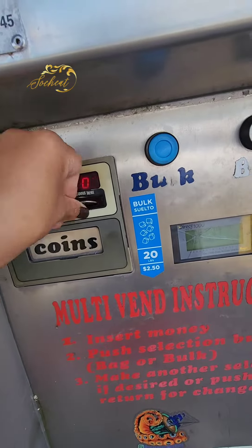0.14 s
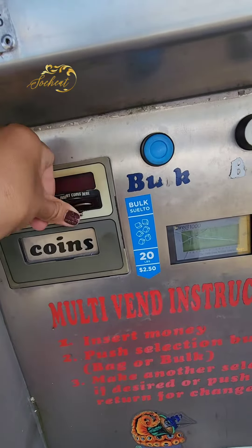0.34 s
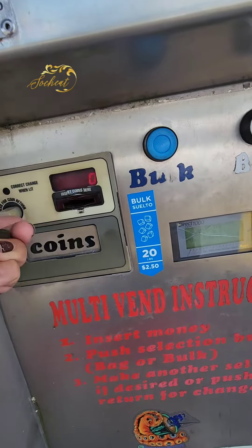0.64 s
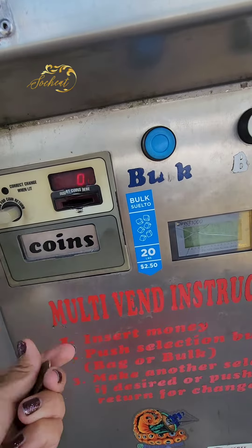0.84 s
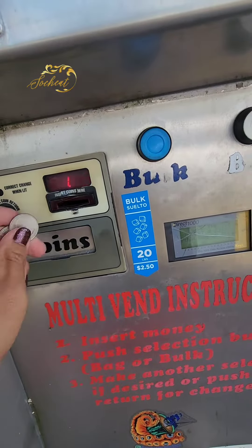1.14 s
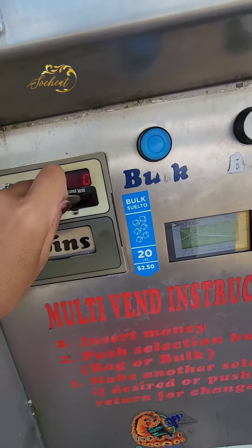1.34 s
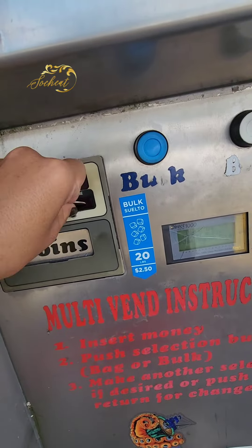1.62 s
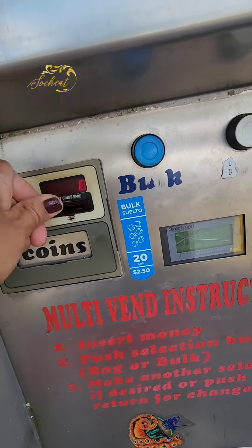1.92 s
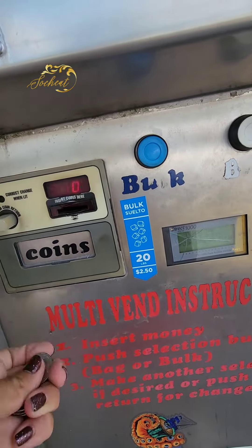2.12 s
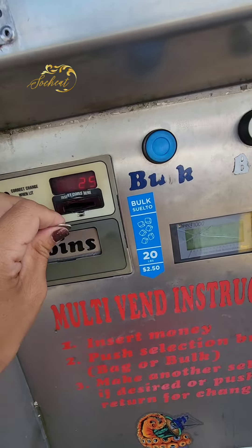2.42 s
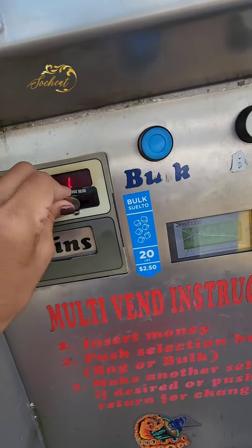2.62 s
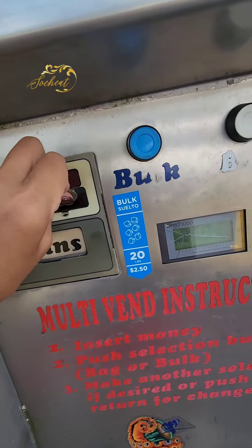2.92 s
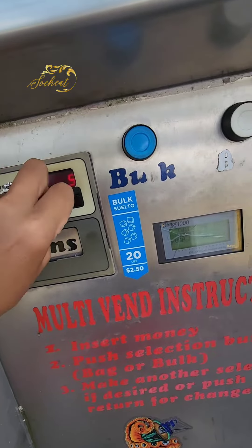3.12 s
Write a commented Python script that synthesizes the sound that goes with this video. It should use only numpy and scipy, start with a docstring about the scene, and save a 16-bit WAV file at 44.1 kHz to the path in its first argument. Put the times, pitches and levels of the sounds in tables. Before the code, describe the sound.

Coins go into a metal vending machine, heard close up outdoors. Light slot taps and bright chinks until 0.55 s, then a cracking, rolling rattle down a hollow chute from 0.6 to 1.0 s. Sparse taps and small chinks follow from 1.1 to 2.0 s, a sharper second drop at 2.1-2.45 s, a hard clack and chink at 2.9 s, then fading taps. Low compressor hum, wavering drone and rumble continue beneath.

```python
"""Outdoors, at a steel vending machine: coins are pushed into its slot, close to a phone.
They tap and scrape at the slot, then crack and roll down a chute in the hollow cabinet: struck modes
under coloured noise bursts. A gate clacks, the panel thuds and loose coins chink in the hand.
The cooling compressor hums in wavering sines, a low drone comes and goes, filtered noise rumbles."""
import sys
import numpy as np
from scipy import signal
from scipy.fft import rfft, irfft
from scipy.io import wavfile
from scipy.ndimage import uniform_filter1d

SR = 44100
rng = np.random.default_rng(int(sys.argv[2]) if len(sys.argv) > 2 else 0)


def wrap_up_sound(samples):
    """Save the sound to the file named by the first command line argument, as 16-bit audio."""
    columns = np.atleast_2d(samples).T
    # keep every value between -1 and 1, then stretch to whole-number steps
    tamed = np.clip(columns, -1, 1)
    steps = np.round(tamed * 32767).astype(np.int16)
    wavfile.write(sys.argv[1], SR, steps)


N = 143766
RING_T = np.arange(SR // 2) / SR  # time axis of every struck sound, half a second long
CRACK_T60_S = 0.043  # dying time of the crack on chute and slot
CHUTE_PAN_DB, SLOT_PAN_DB, COIN_PAN_DB = -1, -0.5, -2  # left minus right


def undb(db):
    """Gain of a level in dB."""
    return 10 ** (np.asarray(db) / 20)


def on_log(points, hz):
    """Read (Hz, value) points on a log-frequency axis."""
    point_hz, value = np.array(points).T
    return np.interp(np.log(np.maximum(hz, 1)), np.log(point_hz), value)


def noise(colour, size, tilt_db=0):
    """Two unrelated noises in one colour, tilted in dB per octave above its first point; joint rms 1."""
    hz = np.maximum(np.fft.rfftfreq(size, 1 / SR), 1)
    octaves = np.log2(np.maximum(hz, colour[0][0]))
    shape = undb(on_log(colour, hz) + tilt_db * octaves)
    x = irfft(rfft(rng.standard_normal((2, size))) * shape, size)
    return x / x.std()


def walk(rate):
    """Slow random wander with a spread near 1: held random steps, smoothed twice."""
    step = int(SR / rate)
    held = np.repeat(rng.standard_normal(N // step + 1), step)
    smooth = uniform_filter1d(uniform_filter1d(held, step), step)
    return smooth[:N] * np.sqrt(2)


def fade(t60):
    """Quick rise and exponential decay."""
    attack_s = 0.00084
    rise = 1 - np.exp(-RING_T / attack_s)
    return rise * np.exp(-np.log(1000) * RING_T / t60)


def burst(colour, t60, tilt_db=0):
    """A crowd of close resonances dying away together, with a new random ripple for each blow."""
    ripple_db, ripple_hz = 3.4, 170  # depth, spacing
    size = len(RING_T)
    knots = np.arange(0, SR / 2, ripple_hz)
    ripple = np.interp(np.fft.rfftfreq(size, 1 / SR), knots, rng.standard_normal(len(knots)))
    x = irfft(rfft(noise(colour, size, tilt_db)) * undb(ripple_db * ripple), size)
    return x / x.std() * fade(t60)


def ring(modes, tilt_db=0, spread=0.0048, favoured_hz=None):
    """Struck modes; each blow weights them anew, most of all near the frequency that its spot favours."""
    favour_db, favour_octaves, scatter_db = 7.5, 0.15, 2
    hz, db, t60 = np.array(modes).T
    if favoured_hz:
        db = db + favour_db * np.exp(-(np.log2(hz / favoured_hz) / favour_octaves) ** 2)
    gains = undb(db + tilt_db * np.log2(hz) + scatter_db * rng.standard_normal(len(hz)))
    gains = gains * np.sqrt(2 / np.sum(gains ** 2))
    hz = hz * (1 + spread * rng.standard_normal(len(hz)))
    out = 0
    for f, gain, decay in zip(hz, gains, t60):
        phase = rng.random((2, 1))  # in turns, unrelated left and right
        out = out + gain * fade(decay) * np.sin(2 * np.pi * (f * RING_T + phase))
    return out


def chatter(bodies, length, rate, scatter_db):
    """Random tiny contacts, shared among several ringing spots; rms 1 over the length."""
    x = 0
    for body in bodies:
        chance, size = rng.random(len(RING_T)), rng.standard_normal(len(RING_T))
        touches = chance < rate / len(bodies) / SR
        contacts = touches * undb(scatter_db * size) * (RING_T < length)
        x = x + signal.fftconvolve(contacts[None], body, axes=1)
    return x * np.sqrt(2 * length * SR / (np.sum(x ** 2) + 1e-12))


def add(out, start, x, pan_db=0):
    """Mix a sound in at its time, leaning left by pan_db."""
    i = int(start * SR)
    out[:, i:i + x.shape[1]] += x[:, :N - i] * undb(np.array([[pan_db], [-pan_db]]) / 2)


# colour of metal edge on metal, in snaps and scrapes [f/Hz, level/dB per Hz]
EDGE_COLOUR = [(400, -2), (2000, 2), (4500, 2.5), (7000, 3), (9500, -6), (13000, -1.5), (16000, -9.5)]


def snap(tilt_db):
    """The first instant of metal touching metal: noise that dies within a few milliseconds."""
    snap_db, snap_s = -2, 0.00086  # level, time constant
    return undb(snap_db) * noise(EDGE_COLOUR, len(RING_T), tilt_db) * np.exp(-RING_T / snap_s)


# coin blows on the chute [t/s, level/dB, brightness/dB per octave, extra cabinet level/dB, favoured f/Hz]
CHUTE_BLOWS = [(0.608, -31.5, -4, -2, 2500), (0.647, -27.5, -4, -3, 2300), (.656, -18.5, 0, -7, 1080),
               (0.6938, -26, -1, 0, 2440), (0.7204, -26.5, -2, -10, 1960), (0.7606, -20, -1.5, -2, 1920),
               (0.796, -35.5, -4, 8, 2400), (0.816, -21.5, -1, -4.5, 2600), (0.8627, -25, -4, -1, 1970),
               (0.8875, -24.5, 0, -6, 4270), (0.906, -33.5, 3, -7, 3240), (0.9742, -32, 0.5, -5, 4270),
               (2.1154, -27.5, -3.5, -13, 2550), (2.1326, -15, 3, -1, 2500), (2.151, -28, -6.5, -12, 2400),
               (2.166, -27.5, -4.5, -7, 1880), (2.2013, -31.5, -3, 0, 4930), (2.2189, -22.5, 1, 1, 1840),
               (2.2335, -30.5, -3.5, 3, 2200), (2.2994, -21.5, -2, -9, 4270), (2.3446, -28, -2.5, -1, 1950),
               (2.409, -36.5, 0, -7, 4270), (2.4195, -32.5, 3, -1, 1950), (2.458, -33.5, 0, -6, 2390)]
# chute modes [f/Hz, relative level/dB, t60/s]
CHUTE_RESONANCES = [(347, -12, 0.12), (862, -9, 0.074), (1085, -4.5, 0.061), (1294, -8.5, 0.04),
                    (1838, 4, 0.062), (1945, 2.5, 0.049), (2215, 0.5, 0.044), (2437, 0.5, 0.065),
                    (2508, -2.5, 0.055), (2750, -1, 0.044), (3260, -3, 0.055), (4275, 4, 0.044),
                    (4880, -2.5, 0.063), (11100, -13, .04)]
# colour of the crack on the chute [f/Hz, level/dB per Hz]
CHUTE_CRACK_COLOUR = [(300, -3), (900, -9.5), (2400, 0), (4800, 2), (7500, -7.5), (11000, -8), (16000, -10)]
# colour of the hollow cabinet [f/Hz, level/dB per Hz]
CABINET_COLOUR = [(300, -17), (900, 1.5), (1500, -3), (2300, 6), (3500, -9), (4700, -10.5), (8000, -12),
                  (16000, -30)]


def chute():
    """A falling coin cracks against the chute, rings it and stirs the cabinet."""
    crack_db, modes_db, cabinet_base_db, cabinet_t60_s = 0.5, -0.5, -6, 0.17
    out = np.zeros((2, N))
    for start, db, tilt, cabinet_db, hz in CHUTE_BLOWS:
        crack = undb(crack_db) * burst(CHUTE_CRACK_COLOUR, CRACK_T60_S, tilt)
        modes = undb(modes_db) * ring(CHUTE_RESONANCES, tilt, favoured_hz=hz)
        cabinet = undb(cabinet_base_db + cabinet_db) * burst(CABINET_COLOUR, cabinet_t60_s)
        add(out, start, undb(db) * (snap(tilt) + crack + modes + cabinet), CHUTE_PAN_DB)
    return out


# coins rolling along the chute [t/s, length/s, level/dB, brightness/dB per octave]
ROLL_RUNS = [(0.564, 0.072, -41, -4.5), (0.667, .19, -42, 1), (.92, 0.088, -43, 2),
             (2.014, 0.09, -41.5, -4), (2.141, 0.15, -42.5, -6)]
# modes of the ramp that the coins roll on [f/Hz, relative level/dB, t60/s]
RAMP_RESONANCES = [(1865, -1.5, .03), (2300, -3, 0.03), (2535, 2, 0.044), (4320, -8, .03)]


def rolls():
    """The rim bumps along the chute and keeps its ramp ringing."""
    bumps_per_s, scatter_db = 480, 2.5
    crack_db, crack_t60_s, ramp_db = 2, 0.023, -1.5
    out = np.zeros((2, N))
    for start, length, db, tilt in ROLL_RUNS:
        spots = [undb(crack_db) * burst(CHUTE_CRACK_COLOUR, crack_t60_s, tilt) for _ in range(2)]
        spots.append(undb(ramp_db) * ring(RAMP_RESONANCES, tilt))
        add(out, start, undb(db) * chatter(spots, length, bumps_per_s, scatter_db), CHUTE_PAN_DB)
    return out


# coin taps on the slot plate [t/s, level/dB, brightness/dB per octave, ring level/dB, favoured f/Hz]
SLOT_TAPS = [(0.0943, -40, -2.5, 0.5, 3120), (0.3405, -29.5, 2, 2.5, 2320), (0.3656, -35, -3, 5, 3150),
             (0.5104, -31, 3.5, -10, 1540), (1.152, -37, 1, 1, 4450), (1.363, -26.5, 0.5, 2.5, 1300),
             (1.3954, -32.5, -5, -2, 2770), (1.4186, -35.5, -0.5, -11, 2780), (1.44, -32.5, 1, -9, 4420),
             (1.5932, -36, -2, -1.5, 2320), (1.8575, -26.5, 2, 3, 3150), (1.995, -30.5, -2, -5, 1540),
             (2.672, -29.5, -3, -12, 3150), (2.8829, -16.5, 2.5, -2.5, 2320), (2.9082, -28, -1, -14, 4420),
             (2.953, -35.5, -2, -1, 4420), (3.0025, -32.5, -4, -0.5, 3150), (3.048, -40.5, -3, 3, 3150),
             (3.139, -29, -2.5, 1.5, 1300)]
# slot plate modes [f/Hz, relative level/dB, t60/s]
SLOT_RESONANCES = [(1289, -9.5, 0.088), (1557, -10.5, 0.078), (2324, -4.5, 0.039), (2850, 0.5, 0.056),
                   (3196, -1, 0.045), (4420, -2, .03), (4880, -9, 0.053), (6140, -12, .04)]
# colour of the crack on the slot and of its plate [f/Hz, level/dB per Hz]
SLOT_COLOUR = [(300, 4), (900, -5), (1500, 3), (3200, -0.5), (6500, -3), (8500, -8.5), (13000, -16.5),
               (16000, -10.5)]


def slot():
    """A held coin taps the slot: a snap and crack, plate modes and a longer noisy plate tail."""
    crack_db, plate_db, plate_t60_s = 2.5, -5.5, 0.15
    out = np.zeros((2, N))
    for start, db, tilt, ring_db, hz in SLOT_TAPS:
        crack = undb(crack_db) * burst(SLOT_COLOUR, CRACK_T60_S, tilt)
        modes = undb(ring_db) * ring(SLOT_RESONANCES, tilt, favoured_hz=hz)
        plate = undb(plate_db) * burst(SLOT_COLOUR, plate_t60_s)
        add(out, start, undb(db) * (snap(tilt) + crack + modes + plate), SLOT_PAN_DB)
    return out


# modes of the gate behind the slot, a coin jammed hard against it [f/Hz, level/dB, t60/s]
GATE_RESONANCES = [(1510, -8, 0.032), (1880, -9, 0.046), (3207, -4.5, 0.076), (3252, -0.5, 0.067),
                   (4970, -17, 0.046), (6450, -4, .035)]


def gate():
    """One hard clack that rings the gate, nearly in step at both ports."""
    start_s, level_db, pan_db = 2.8832, -21.5, 12
    port_phase = np.array([[0], [.15]])  # turns, left and right
    out = np.zeros((2, N))
    clack = 0
    for hz, db, t60 in GATE_RESONANCES:
        turns = hz * RING_T + rng.random() + port_phase
        clack = clack + undb(db) * fade(t60) * np.sin(2 * np.pi * turns)
    add(out, start_s, undb(level_db) * np.sqrt(2) * clack, pan_db)
    return out


# coin edges sliding on metal [t/s, length/s, level/dB, brightness/dB per octave]
SCRAPE_RUNS = [(0.519, 0.045, -35.5, -1.5), (0.7232, 0.027, -28.5, 5.5), (0.897, .02, -42, 0),
               (2.359, .018, -30, -2), (2.863, 0.02, -36.5, -3), (3.136, 0.024, -32, 3.5)]


def scrapes():
    """A sliding rim catches and slips in a dense run of tiny ticks."""
    slips_per_s, scatter_db, slip_t60_s = 700, 3, 0.019
    out = np.zeros((2, N))
    for start, length, db, tilt in SCRAPE_RUNS:
        spots = [burst(EDGE_COLOUR, slip_t60_s, tilt) for _ in range(3)]
        add(out, start, undb(db) * chatter(spots, length, slips_per_s, scatter_db), COIN_PAN_DB)
    return out


# dull knocks on the front panel [t/s, level/dB]
PANEL_KNOCKS = [(0.58, -28.5), (1.1, -27), (2.884, -31), (3.003, -25.5), (3.14, -31.5), (2, -30.5),
                (.657, -37), (2.134, -24), (1.996, -32)]
# front panel modes [f/Hz, relative level/dB, t60/s]
PANEL_RESONANCES = [(317, -14, .06), (562, 0.5, 0.079), (786, -3, 0.052), (897, 2, 0.048)]
# colour of the panel's body [f/Hz, level/dB per Hz]
PANEL_COLOUR = [(120, -9), (300, 0), (450, 1), (570, -3), (850, -7), (1300, -11), (3000, -16), (10000, -50)]


def thumps():
    """Now and then the whole front panel thuds: a few low modes and a short dull burst."""
    body_db, body_t60_s = -2.5, 0.047
    out = np.zeros((2, N))
    for start, db in PANEL_KNOCKS:
        body = undb(body_db) * burst(PANEL_COLOUR, body_t60_s)
        add(out, start, undb(db) * (ring(PANEL_RESONANCES) + body))
    return out


# coins chinking together [t/s, tick level/dB, ring level/dB, ring time factor left by the fingers, pitch ratio]
COIN_CHINKS = [(0.5373, -22.5, -39, .4, 1), (0.556, -21.5, -37, .4, 1), (.781, -30, -48, .1, 1),
               (1.2238, -27.5, -33, 0.52, 1), (1.6469, -28, -26, .8, 1), (1.722, -38, -32, 1.3, 0.99),
               (1.994, -28.5, -34.5, 0.32, 1), (2.597, -50, -27, 0.18, .98), (2.908, -15, -20, 0.19, 0.82),
               (3.14, -35, -32, 1.6, 0.98)]
# modes of a coin at pitch ratio 1 and ring time factor 1 [f/Hz, relative level/dB, t60/s]
COIN_RESONANCES = [(6300, -22, 0.4), (9420, -15, 0.44), (15230, -1.5, 0.23), (15100, -8, 0.1),
                   (15440, -2, 0.2), (15500, 3.5, 0.2)]
# colour of coin striking coin [f/Hz, level/dB per Hz]
TICK_COLOUR = [(500, -18), (2000, -18), (5000, 2), (7000, 2), (9500, -10), (11500, 2), (12900, 2),
               (14000, 3), (16000, -5.5)]
# colour of the many high overtones of a handful of coins [f/Hz, level/dB per Hz]
SHIMMER_COLOUR = [(1000, 1.5), (4000, -5), (6500, -4.5), (9400, -3.5), (11000, -10), (14500, -9),
                  (15300, -4), (16000, -0.5)]


def chinks():
    """Coin meets coin: a bright tick, two slightly unlike rings and a shimmer, damped by the fingers."""
    size_spread, second_coin_db, tick_t60_s = 0.002, -10, 0.03
    shimmer_db, shimmer_t60_s = -3.5, 0.36  # time at ring time factor 1
    out = np.zeros((2, N))
    for start, tick_db, ring_db, free, pitch in COIN_CHINKS:
        modes = [(hz * pitch, db, t60 * free) for hz, db, t60 in COIN_RESONANCES]
        first = ring(modes, spread=size_spread)
        second = undb(second_coin_db) * ring(modes, spread=size_spread)
        shimmer = undb(shimmer_db) * burst(SHIMMER_COLOUR, shimmer_t60_s * free)
        tick = undb(tick_db) * burst(TICK_COLOUR, tick_t60_s)
        add(out, start, tick + undb(ring_db) * (first + second + shimmer), COIN_PAN_DB)
    return out


# left minus right of the sounds that pass through ports() [f/Hz, level/dB]
PORT_BALANCE = [(500, 2), (1100, 4), (2000, 1.5), (4000, -4), (12000, -0.5)]


def ports(x):
    """Part of the sound comes straight, left port first; the middle range leans left, the treble right."""
    direct_share, direct_lag_s = 0.32, 0.0002103  # amplitude share and delay at the right port
    hz = np.fft.rfftfreq(N, 1 / SR)
    left, scattered = rfft(x)
    direct = left * np.exp(-2j * np.pi * hz * direct_lag_s)
    right = direct_share * direct + np.sqrt(1 - direct_share ** 2) * scattered
    lean_db = on_log(PORT_BALANCE, hz)
    return irfft(np.array([left, right]) * undb(np.array([lean_db, -lean_db]) / 2), N)


# compressor lines [f/Hz, level/dB rms before waver and lean, waver share]
HUM_LINES = [(171.8, -28.5, 0.037), (191.3, -40.5, 0.28), (275.5, -50.5, 0.55), (402, -58, 0.57),
             (427.5, -57, 0.54), (513.6, -51, 0.46), (571, -57.5, 0.42), (859, -63, 1)]


def compressor():
    """Wavering motor lines that reach the left port a little sooner and lean left."""
    port_lag_s, drift_hz = 0.00017, 0.599
    t = np.arange(N) / SR + np.array([[port_lag_s], [0]])
    out = 0
    for hz, db, waver in HUM_LINES:
        level = undb(db) * (1 + waver * walk(8.94))
        drift = drift_hz * np.cumsum(walk(4.06)) / SR
        out = out + level * np.sin(2 * np.pi * (hz * t + drift + rng.random()))
    return np.sqrt(2) * out * undb(np.array([[.6], [-.6]]))


# level of the low drone [t/s, level/dB rms before waver]
DRONE_LEVEL = [(0, -35), (.85, -33), (1, -49), (1.62, -43), (1.84, -29.5), (2, -46.5)]


def drone():
    """A low tone under the hum that comes and goes, its pitch and level wandering."""
    drone_hz, waver_share = 112.7, 0.43
    t = np.arange(N) / SR
    drift = np.cumsum(walk(3.97)) / SR  # the pitch wanders by about 1 Hz
    tone = np.sin(2 * np.pi * (drone_hz * t + drift))
    level = undb(np.interp(t, *np.array(DRONE_LEVEL).T))
    return np.sqrt(2) * tone * level * (1 + waver_share * walk(8.94))


# colour of the outdoor rumble [f/Hz, level/dB per Hz]
OUTDOOR_COLOUR = [(8, -35), (20, -13), (40, -8.5), (65, -1.5), (100, -2.5), (140, -3), (220, -8),
                  (320, -15), (550, -15.5), (800, -23), (1500, -27), (3000, -33.5), (6000, -39),
                  (12000, -40.5), (16000, -49.5)]
# likeness of the two channels in the rumble [f/Hz, likeness 0-1]
CHANNEL_LIKENESS = [(100, 0.99), (250, 0.99), (500, 0.16), (1500, 0)]


def outdoors():
    """Distant rumble, alike in both channels in the bass, with a faint wide hiss."""
    rumble_db, swell_db = -32.5, 0.62
    alike = np.clip(on_log(CHANNEL_LIKENESS, np.fft.rfftfreq(N, 1 / SR)), 0, 1)
    widths = np.sqrt([(1 + alike) / 2, (1 - alike) / 2])
    mid, side = irfft(rfft(noise(OUTDOOR_COLOUR, N)) * widths, N)
    return np.array([mid + side, mid - side]) * undb(rumble_db + swell_db * walk(5.32))


def scene():
    """Coins, machine and surroundings together."""
    machine = chute() + rolls() + slot() + thumps()
    coins = scrapes() + chinks()
    return ports(machine + coins) + gate() + compressor() + drone() + outdoors()


def record(dry):
    """The phone cuts the top: a steep low-pass."""
    top_hz = 15900
    return signal.sosfilt(signal.ellip(10, .2, 80, top_hz, fs=SR, output="sos"), dry)


dry = scene()
out = record(dry)
wrap_up_sound(out)
```